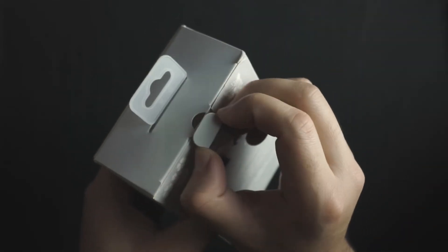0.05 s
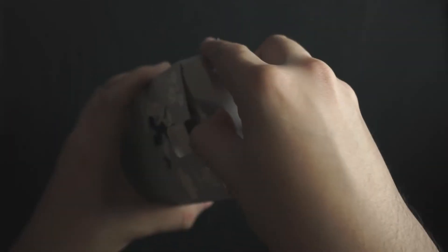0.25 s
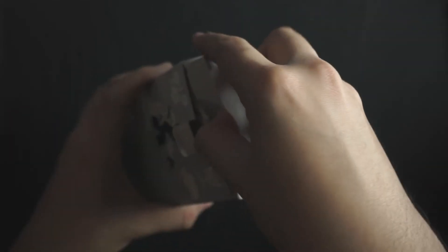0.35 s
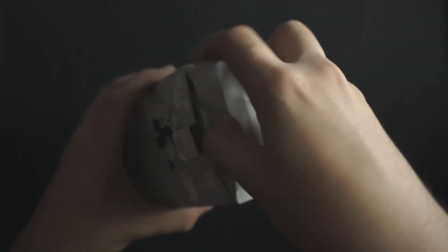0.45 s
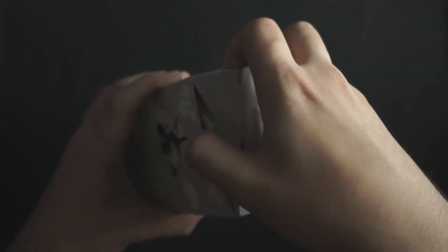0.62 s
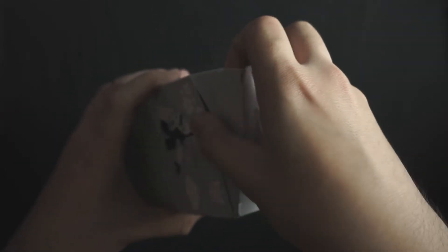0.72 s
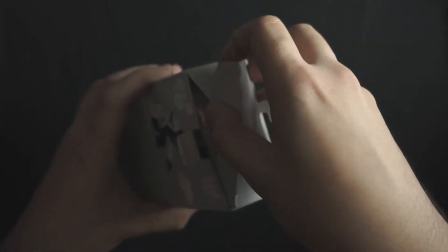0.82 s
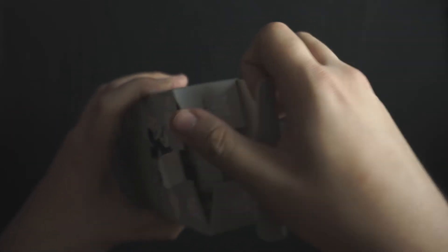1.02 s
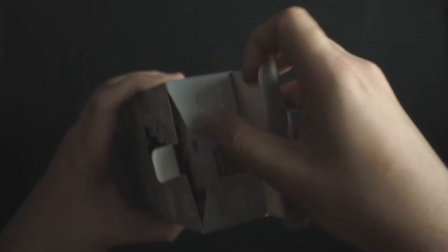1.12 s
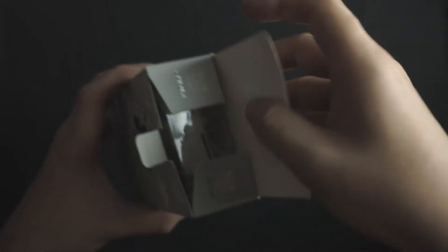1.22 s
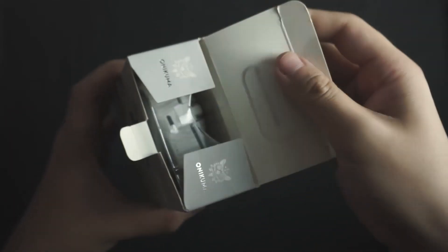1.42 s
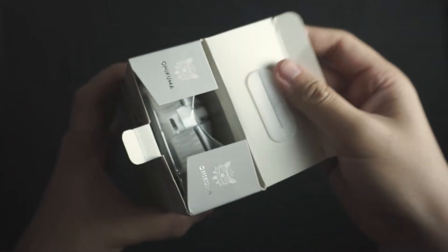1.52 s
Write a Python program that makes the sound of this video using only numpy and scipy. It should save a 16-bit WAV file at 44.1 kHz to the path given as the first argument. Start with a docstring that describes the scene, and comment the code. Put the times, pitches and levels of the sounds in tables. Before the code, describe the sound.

Cardboard scrapes, pops and crackles as hands pull open a small box in a quiet room.

```python
"""Close pops, scrapes and papery snaps: two hands open a small cardboard box in a quiet room.
A thumb pops the locking tab and drags over the board, which sticks, slips and creaks. The tucked flap
scrapes out in three pulls, each ending in snaps that ring the lid. Then a finger slides off and the
lid folds back on its crackling crease. Quick echoes off the table and hands widen the sound."""
import sys
import numpy as np
from scipy import signal
from scipy.fft import rfft, irfft
from scipy.io import wavfile

SR = 44100
rng = np.random.default_rng(int(sys.argv[2]) if len(sys.argv) > 2 else 0)


def file_out(sig):
    """Save sig as 16-bit WAV at sys.argv[1]."""
    # one column per channel
    cols = np.atleast_2d(sig).T
    # limit, then scale
    lim = np.clip(cols, -1, 1)
    pcm = np.round(lim * 32767).astype(np.int16)
    wavfile.write(sys.argv[1], SR, pcm)


N = 68355
T = np.arange(N) / SR
HZ = np.fft.rfftfreq(4096, 1 / SR)  # frequency grid of the EQ curves


def amp(db):
    """Decibels to gain."""
    return 10 ** (np.asarray(db) / 20)


def unit(x):
    """Scales to an rms of one."""
    return x / np.sqrt(np.mean(x ** 2) + 1e-20)


def curve(points, hz=HZ):
    """Joins (frequency, value) points on a log-frequency axis."""
    f, value = np.transpose(points)
    return np.interp(np.log(hz + 1), np.log(f), value)


def colour(x, eq_db):
    """Minimum-phase EQ that shapes the tone and keeps the power of white noise."""
    log_gain = np.log(amp(np.r_[eq_db, eq_db[-2:0:-1]]))
    taps = np.fft.ifft(np.exp(np.conj(signal.hilbert(log_gain)))).real
    return signal.fftconvolve(x, taps / np.linalg.norm(taps))[:N]


def ringing(modes):
    """Impulse response of a set of damped modes."""
    t = T[:4096]
    return sum(amp(db) * np.exp(-np.pi * width * t) * np.cos(2 * np.pi * hz * t)
               for hz, width, db in modes)


def resonate(x, hz, width_hz):
    """A resonance that follows a pitch curve."""
    turn = np.exp(2j * np.pi * np.cumsum(hz) / SR)
    pole = np.exp(-np.pi * width_hz / SR)
    return (turn * signal.lfilter([(1 - pole) ** 2], [1, -2 * pole, pole * pole], x / turn)).real


def strokes(rows):
    """Envelope of strokes that each swell to a peak and die away."""
    swells = [amp(db) * np.exp(-np.maximum((s - T) / rise, (T - s) / release))
              for s, db, rise, release in rows]
    return np.sqrt(sum(swell ** 2 for swell in swells))


def burst(s, decay_s):
    """Envelope of a sudden release."""
    return (T >= s) * np.exp(-abs(T - s) / decay_s)


def slips(per_s, spread_db, hiss):
    """Fibres catching and letting go: clicks of uneven size over a smooth hiss."""
    size = amp(spread_db * np.minimum(rng.exponential(1, N), 3))
    clicks = size * rng.choice([-1, 1], N) * (rng.random(N) < per_s / SR)
    return unit(unit(clicks) + hiss * rng.standard_normal(N))


def judder(rate_hz, depth_db):
    """Quick random changes of grip make the level flutter."""
    f = np.fft.rfftfreq(N, 1 / SR)
    wobble = irfft(rfft(rng.standard_normal(N)) * f / rate_hz * np.exp(-(f / rate_hz) ** 2), N)
    return unit(amp(depth_db * unit(wobble)))


def smear(x, bass_delay_s=0.0014):
    """Bending waves cross the board treble first, so each click becomes a short rasp."""
    f = np.fft.rfftfreq(2 * N, 1 / SR)
    return irfft(rfft(x, 2 * N) * np.exp(-2j * np.pi * bass_delay_s * (f - f ** 2 / SR)))[:N]


def flap_eq(points, wedged):
    """An EQ curve with the flap's resonances on top, weaker once it is no longer wedged."""
    # resonances of the wedged flap: (frequency [Hz], width [Hz], lift [dB])
    peaks = [(1480, 130, 6), (1590, 50, 3), (2800, 110, 4), (3380, 60, 6), (3545, 50, 12), (3680, 45, 6),
             (3995, 60, 6), (4325, 55, 8), (4720, 80, 10), (5255, 70, 8)]
    lift_db = sum(db / (1 + (2 * (HZ - hz) / width) ** 2) for hz, width, db in peaks)
    return curve(points) + (1 if wedged else 0.49) * lift_db


def crack(s, decay_s, tilt_db, pivot_hz=4000, size=2048):
    """A sudden burst of breaking fibres, duller or brighter by tilt_db per octave."""
    # tone of a crack: (frequency [Hz], relative level [dB])
    crack_eq = [(60, -38.5), (170, -4.5), (420, -3), (750, -2), (1150, -3), (2500, 3.5), (4500, 3.5),
                (6800, 1), (8300, 4.5), (12000, 5), (16000, 2)]
    fall = burst(0, decay_s)[:size]
    phase = np.angle(rfft(fall * rng.standard_normal(size), 2 * size))
    white = irfft(np.exp(1j * phase))[:size]
    white *= np.linalg.norm(fall) / np.linalg.norm(white)
    placed = np.pad(white, (round(s * SR), N))[:N]
    octaves = np.log2(np.maximum(HZ, 800) / pivot_hz)
    return colour(placed, flap_eq(crack_eq, wedged=False) + tilt_db * octaves)


def room_tone():
    """Steady low rumble with a faint hiss, mostly common to both ears."""
    # tone of the quiet room: (frequency [Hz], relative level [dB])
    room_eq = [(20, -13), (60, -11.5), (120, -0.5), (230, -4.5), (400, -15), (1000, -20.5), (3000, -25.5),
               (6500, -23), (16000, -35.5)]
    shared, left, right = (colour(rng.standard_normal(N), curve(room_eq)) for _ in range(3))
    return amp(-55) * unit(shared + 0.45 * np.array([left, right]))


def reflections(x, t60, delay_s):
    """Scattered echoes, different at each ear, each band dying at its own speed."""
    shape = (2, SR // 2)
    echoes = rng.standard_normal(shape) * (rng.random(shape) < 0.15)
    hz, t, bands = signal.stft(echoes, SR, nperseg=256)
    tail = signal.istft(bands * amp(-60 * t / curve(t60, hz)[:, None]), SR, nperseg=256)[1]
    tail /= np.linalg.norm(tail, axis=1, keepdims=True)
    delayed = np.pad(tail, ((0, 0), (round(delay_s * SR), 0)))
    return signal.fftconvolve(x[None], delayed, axes=1)[:, :N]


def table_echoes(x):
    """Quick echoes off the table and hands, in opposite polarity left and right for width."""
    # tone of the side signal: (frequency [Hz], relative level [dB])
    side_eq = [(100, -8), (700, -7), (2000, -5), (16000, 2)]
    echoes = reflections(x, t60=[(300, 0.046), (10000, 0.012)], delay_s=0.00034)[0]
    side = amp(-5.5) * colour(echoes, curve(side_eq))
    return np.array([side, -side])


def handling(start_s=0.21):
    """Soft low bumps of the box in the hands."""
    # tone of the bumps: (frequency [Hz], relative level [dB])
    bump_eq = [(60, -13), (115, -15.5), (280, -6), (600, -19.5)]
    bumps = (T > start_s) * slips(per_s=130, spread_db=-1.5, hiss=0.59)
    return amp(-51) * colour(bumps, curve(bump_eq))


def knocks():
    """The whole box jolts and gives a short, dull note."""
    # jolts in the hands: (time [s], level [dB], pitch [Hz], decay [s])
    jolts = [(0.21, -46.5, 170, 0.0057), (1.049, -29, 520, 0.0068), (0.52, -23, 780, 0.0041),
             (1, -39.5, 193, 0.0058)]
    return sum(amp(db) * burst(s, decay) * np.sin(2 * np.pi * hz * (T - s))
               for s, db, hz, decay in jolts)


def ticks():
    """Single catches of the board's edges, some dull and some bright."""
    # edge catches: (time [s], level [dB], treble tilt [dB/octave])
    catches = [(0.051, -42.5, -2), (0.1242, -42.5, 5), (0.186, -40, -10.5), (0.3019, -26.5, -7.5),
               (0.335, -29, -3.5), (0.3465, -32, 4), (0.365, -28.5, -3.5), (0.8936, -30.5, 1.5),
               (1.131, -30, -4.5), (1.3138, -24.5, 0.5), (1.33, -30, -3.5), (1.368, -26.5, -2)]
    return sum(amp(db) * crack(s, decay_s=0.0018, tilt_db=tilt) for s, db, tilt in catches)


def dragging():
    """Board rubs on board: a dull rasp and a hollow note that moves as the flap bends."""
    # course of the rub: (time [s], level [dB], hollow note [Hz])
    rub = [(0.05, -62.5, 817), (0.2, -70, 780), (0.216, -37, 815), (0.25, -37.5, 540), (0.30, -42, 700),
           (0.47, -41.5, 860), (0.501, -29, 935), (0.62, -61, 715), (0.714, -41.5, 770), (0.76, -58, 760),
           (0.808, -30, 853), (0.851, -59, 820), (0.906, -65, 840), (0.926, -40.5, 830),
           (0.975, -53.5, 810), (1.033, -36, 726), (1.09, -60.5, 840), (1.169, -46, 553), (1.22, -69, 529)]
    # tone of the rasp: (frequency [Hz], relative level [dB])
    rasp_eq = [(60, -33), (220, -6), (450, -3.5), (800, 0.5), (1150, -5.5), (1500, 5), (3000, -13.5),
               (4800, -8), (6300, -37), (16000, -21)]
    s, db, hz = np.transpose(rub)
    grip = slips(per_s=1800, spread_db=3.0, hiss=0.41) * judder(rate_hz=44, depth_db=1.5)
    note = amp(-2.5) * unit(resonate(grip, np.interp(T, s, hz), width_hz=150))
    rasp = smear(colour(grip, curve(rasp_eq)))
    return amp(np.interp(T, s, db)) * (note + rasp)


def lid_opening():
    """A finger hisses off the smooth lid, then the crease crackles as it bends."""
    # finger slide and crease bends: (peak time [s], level [dB], rise [s], release [s])
    slides = [(1.246, -29.5, 0.006, 0.03)]
    bends = [(1.38, -38.5, 0.034, .08), (1.517, -36, 0.013, .04), (1.55, -23.5, 0.0068, .02)]
    # tone of each: (frequency [Hz], relative level [dB])
    skin_eq = [(200, -61), (700, -8), (7000, -12.5), (12500, 2), (16000, -1.5)]
    crease_eq = [(100, 10), (280, -11), (700, -8), (1300, -10), (1900, -2), (3000, -1), (5000, -11),
                 (16000, -16)]
    skin = strokes(slides) * slips(per_s=9600, spread_db=3.0, hiss=0.33)
    crease = strokes(bends) * slips(per_s=4100, spread_db=-1, hiss=0.56)
    return smear(colour(skin, curve(skin_eq)) + colour(crease, curve(crease_eq)))


def thumb_creak(jitter=0.006):
    """The board sticks and slips in nearly even steps; each rings the wall and rasps the flap's edge."""
    # stick-slip runs: (start [s], length [s], slip rate [1/s], wall ring [dB], edge rasp [dB])
    creaks = [(0.268, 0.027, 167, -33.5, -66), (0.3033, 0.034, 197, -34.5, -46),
              (0.387, 0.019, 205, -37, -31), (0.4234, 0.01, 262, -39, -37), (0.463, 0.019, 262, -42.5, -32),
              (0.4956, 0.032, 236, -41, -28)]
    # modes of the box wall: (frequency [Hz], width [Hz], relative level [dB])
    wall_modes = [(255, 50, -13), (345, 50, -9), (675, 70, -2), (785, 70, 0), (985, 60, -4),
                  (1400, 110, -11)]
    # tone of the flap's edge: (frequency [Hz], relative level [dB])
    edge_eq = [(200, -26), (1600, -7.5), (3000, -2), (4200, 6), (7500, -10.5), (16000, -3)]
    wall_kicks, edge_kicks = np.zeros((2, N))
    for start, length, per_s, wall_db, edge_db in creaks:
        steps = start + np.arange(0, length, 1 / per_s)
        steps += jitter / per_s * rng.standard_normal(N)[:len(steps)]
        at = np.round(steps * SR).astype(int)
        wall_kicks[at] += amp(wall_db) * np.sqrt(SR / per_s)
        edge_kicks[at] += amp(edge_db) * np.sqrt(SR / per_s)
    ring = ringing(wall_modes)
    wall = signal.fftconvolve(wall_kicks, ring / np.linalg.norm(ring))[:N]
    tear = burst(0, decay_s=0.0012)  # each slip tears a few fibres
    tearing = signal.fftconvolve(edge_kicks, tear / np.linalg.norm(tear))[:N]
    grit = amp(-9) * tearing * rng.standard_normal(N)
    return smear(wall + colour(edge_kicks + grit, flap_eq(edge_eq, wedged=True)))


def scraping():
    """The flap's edge grates along the wall, wedged at first and looser on the later pulls."""
    # envelope of the first pull: (time [s], level [dB])
    first_pull = [(0.215, -83), (0.24, -44), (0.33, -44), (0.372, -45), (0.397, -29), (0.44, -42.5),
                  (0.485, -32), (0.505, -28), (0.528, -24), (0.538, -48), (0.58, -39.5), (0.605, -47),
                  (0.70, -51.5), (0.76, -69)]
    # pulls that tighten, then let go: (peak time [s], level [dB], rise [s], release [s])
    later_pulls = [(0.725, -36.5, 0.014, 0.033), (0.789, -21, 0.0085, 0.014), (0.802, -20, 0.011, 0.0057),
                   (0.825, -35.5, 0.0059, 0.032), (0.932, -37, 0.014, 0.014), (1.0, -31.5, 0.023, 0.048),
                   (1.04, -37, 0.056, 0.04), (1.16, -43, 0.22, 0.1)]
    # tone of each: (frequency [Hz], relative level [dB])
    tight_eq = [(80, -48), (250, 4.5), (600, -3), (1100, -3), (2700, 1.5), (4200, 3), (7000, -0.5),
                (11000, -4), (16000, -15.5)]
    loose_eq = [(80, -41), (300, 2), (800, -2.5), (1150, 0), (2200, 1), (4500, 2.5), (6800, -2), (8300, 1),
                (11000, -3.5), (16000, -5)]
    tight = amp(np.interp(T, *np.transpose(first_pull))) * slips(per_s=3500, spread_db=0.5, hiss=0.78)
    loose = strokes(later_pulls) * slips(per_s=8000, spread_db=6.0, hiss=0.78)
    loose *= judder(rate_hz=86, depth_db=1.96)
    return smear(colour(tight, flap_eq(tight_eq, wedged=True))
                 + colour(loose, flap_eq(loose_eq, wedged=False)))


def crunching():
    """The lid's edge crunches just after it slips free."""
    # crunches: (peak time [s], level [dB], rise [s], release [s])
    crunches = [(0.546, -18, 0.0011, 0.0027), (0.812, -28, 0.0036, 0.014), (1.04, -23, 0.0045, 0.01)]
    # their midrange bite: (frequency [Hz], relative level [dB])
    crunch_eq = [(200, -23), (1100, -13), (1450, 7.5), (2000, -1.5), (2700, -3), (16000, -49)]
    return colour(strokes(crunches) * slips(per_s=3200, spread_db=4.5, hiss=0.47), curve(crunch_eq))


def tab_pop(band_hz=(3020, 4700)):
    """The small stiff locking tab pops out of its slot with a hard, narrow crack."""
    band = signal.butter(3, band_hz, "band", fs=SR, output="sos")
    noise = unit(signal.sosfilt(band, rng.standard_normal(N)))
    return amp(-21) * burst(s=0.2246, decay_s=0.0039) * noise


def snaps():
    """Tab and flap slip free with bursts of fibre cracks, and the freed lid rings."""
    # releases: (time [s], crack level [dB], crack decay [s], treble tilt [dB/octave], lid kick [dB])
    releases = [(0.224, -17, 0.0033, -5.5, -16.5), (0.5297, -9.5, 0.0014, 2.5, -33),
                (0.544, -17, 0.0064, -2.5, -17), (0.558, -30, .002, 7, -48),
                (0.5711, -25.5, 0.011, -2, -48), (0.8028, -18, 0.0019, 8, -21),
                (0.823, -32, 0.0038, -9, -30), (1.0090, -19, 0.002, 1.5, -23.5),
                (1.0227, -14, 0.0058, -2.5, -23), (1.034, -18.5, 0.0052, 1, -36),
                (1.042, -57, 0.0034, -26, -19)]
    # modes of the lid: (frequency [Hz], width [Hz], relative level [dB])
    lid_modes = [(600, 120, -20), (800, 90, -20), (1000, 90, -21), (1340, 130, -7), (1478, 85, 2),
                 (1610, 120, -6), (1800, 140, -13), (2780, 110, -21)]
    cracks, kicks = np.zeros((2, N))
    for s, crack_db, decay_s, tilt_db, kick_db in releases:
        cracks += amp(crack_db) * crack(s, decay_s, tilt_db)
        kicks[round(s * SR)] += amp(kick_db)
    lid = amp(-1.5) * signal.fftconvolve(kicks, ringing(lid_modes))[:N]
    return cracks + smear(lid)


def ear(x, side):
    """One ear's half of the stereo difference in level and phase (side 1 is left, -1 right)."""
    # stereo balance: (frequency [Hz], left minus right [dB])
    balance = [(40, -1), (150, -2.5), (600, -1.2), (1300, -.8), (2600, 2.3), (5000, 3.7), (16000, 4)]
    # stereo phase: (frequency [Hz], lead of the left ear [rad])
    lead = [(100, -.15), (600, -.7), (2000, -.4), (16000, -.1)]
    f = np.fft.rfftfreq(2 * N, 1 / SR)
    response = amp(side * curve(balance, f) / 2) * np.exp(0.5j * side * curve(lead, f))
    return irfft(rfft(x, 2 * N) * response)[:N]


def scene(low_cut_hz=237):
    """The box, close and a little to the left, over a table in a quiet room with a short tail."""
    # room decay: (frequency [Hz], time to fall 60 dB [s])
    room_t60 = [(100, 0.18), (500, 0.33), (1500, 0.35), (5000, 0.23), (10000, 0.037), (16000, 0.17)]
    board = (scraping() + crunching() + dragging() + thumb_creak()
             + tab_pop() + snaps() + ticks() + lid_opening())
    low_cut = signal.butter(3, low_cut_hz, "high", fs=SR, output="sos")
    box = signal.sosfilt(low_cut, board) + knocks() + handling()
    close = box + table_echoes(box)
    tail = amp(-9) * reflections(box, room_t60, delay_s=0.007)
    left, right = close + tail + room_tone()
    return np.array([ear(left, 1), ear(right, -1)])


def record(dry, cutoff_hz=15950):
    """A steep low-pass trims the very top of the treble."""
    low_pass = signal.firwin(511, cutoff_hz, window=("kaiser", 9), fs=SR)
    return signal.oaconvolve(dry, low_pass[None], "same")


dry = scene()
out = record(dry)
file_out(out)
```